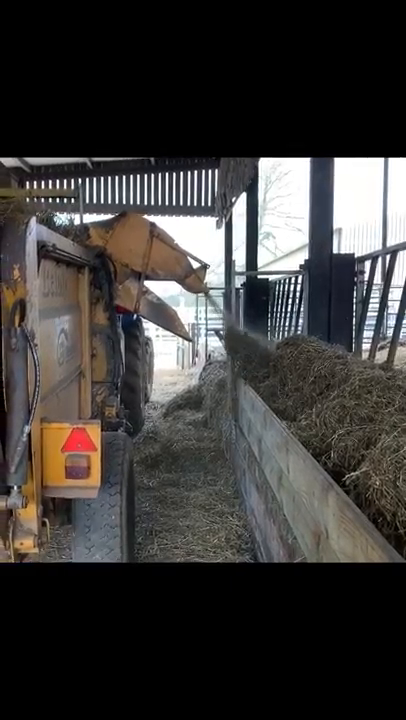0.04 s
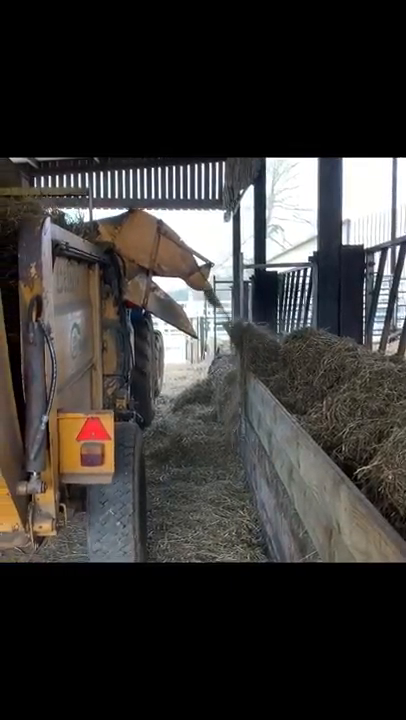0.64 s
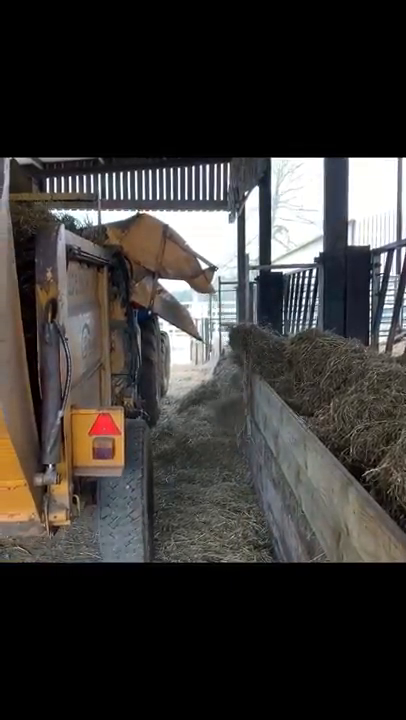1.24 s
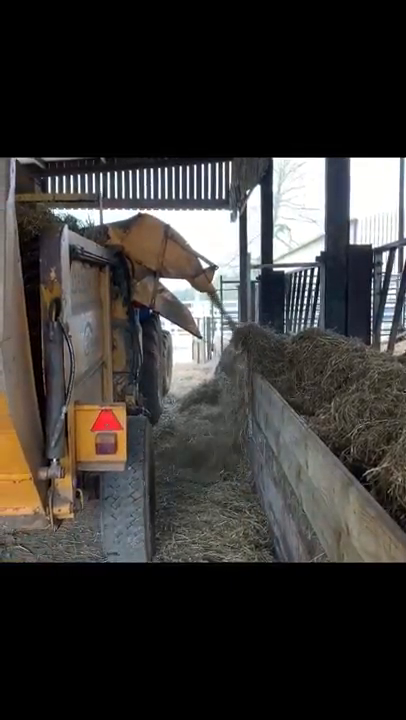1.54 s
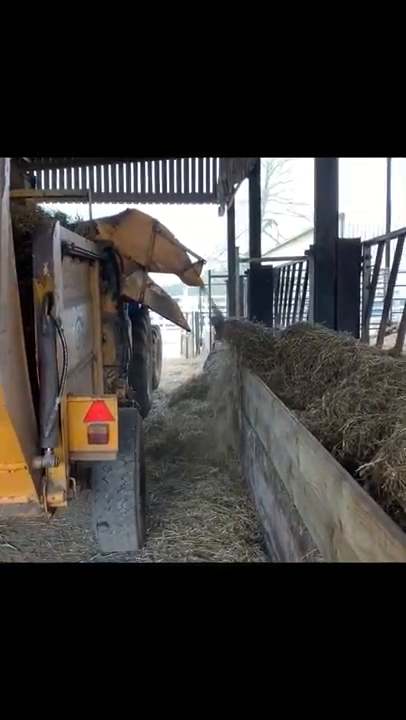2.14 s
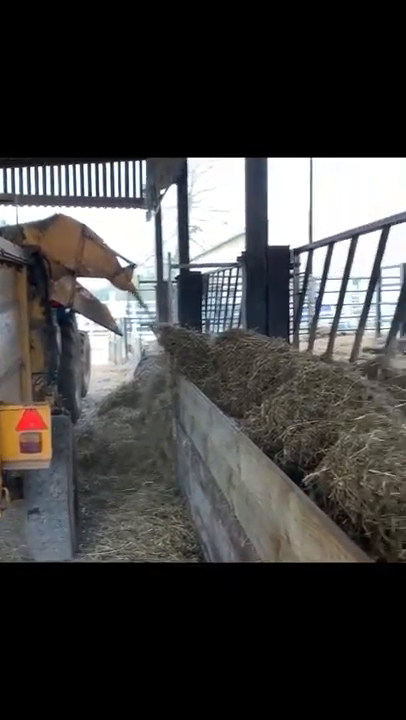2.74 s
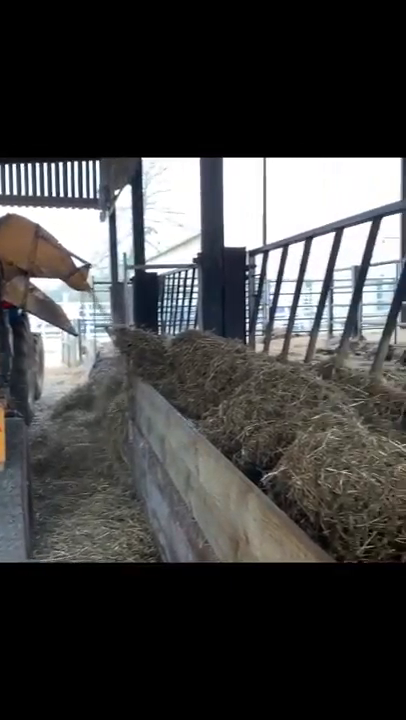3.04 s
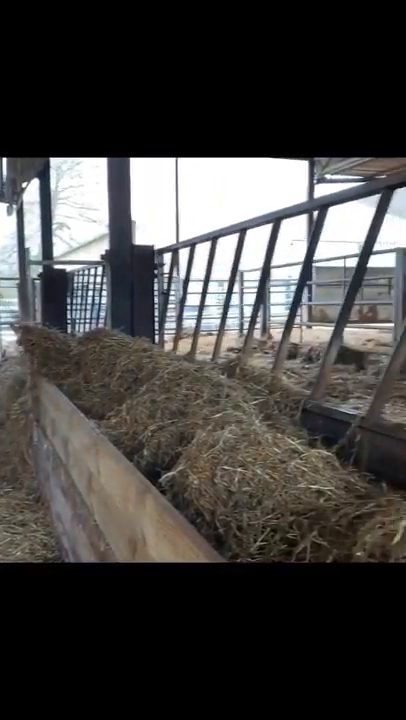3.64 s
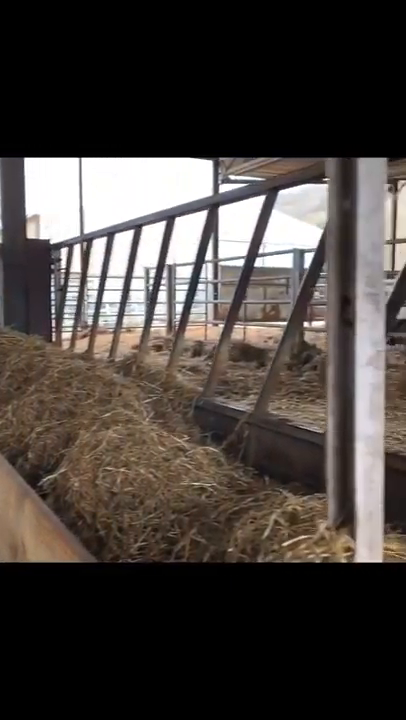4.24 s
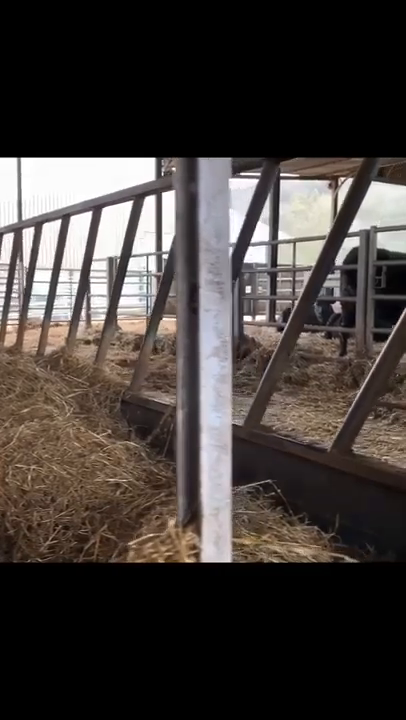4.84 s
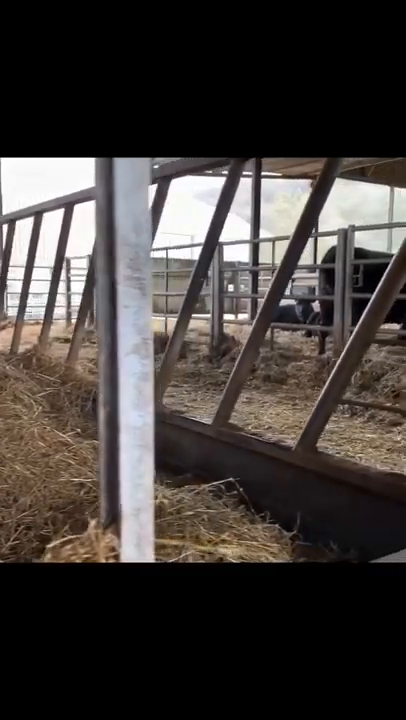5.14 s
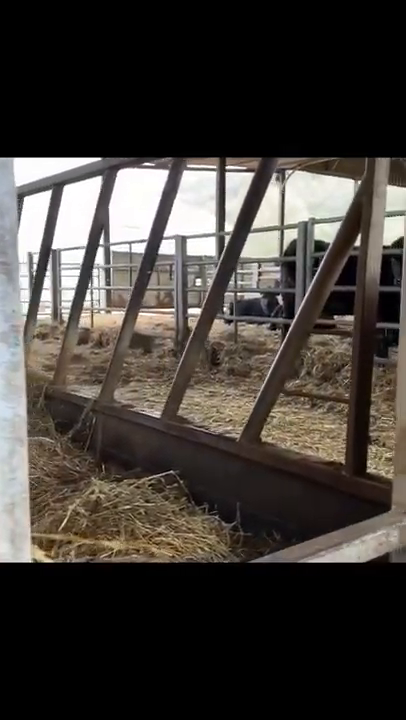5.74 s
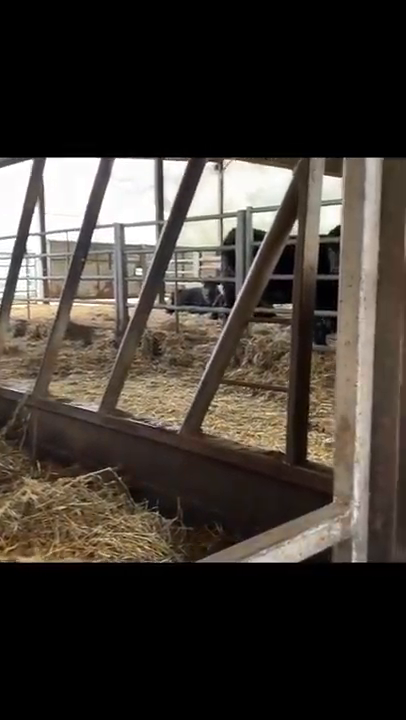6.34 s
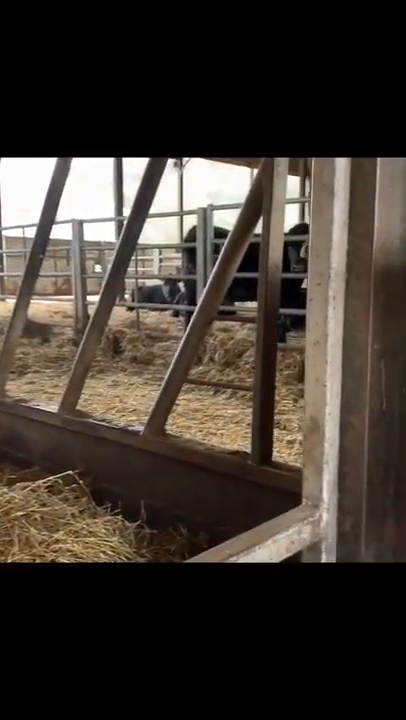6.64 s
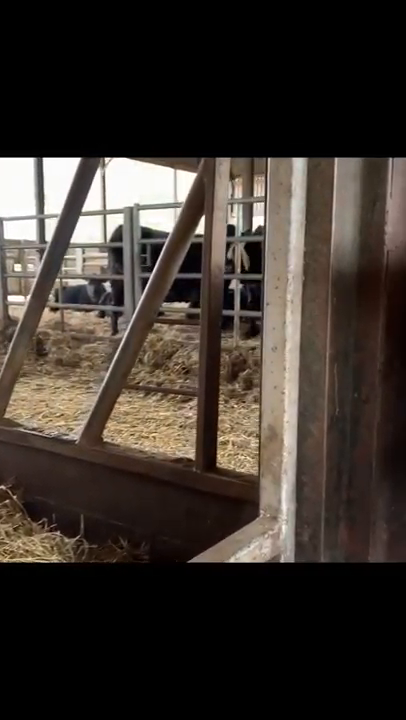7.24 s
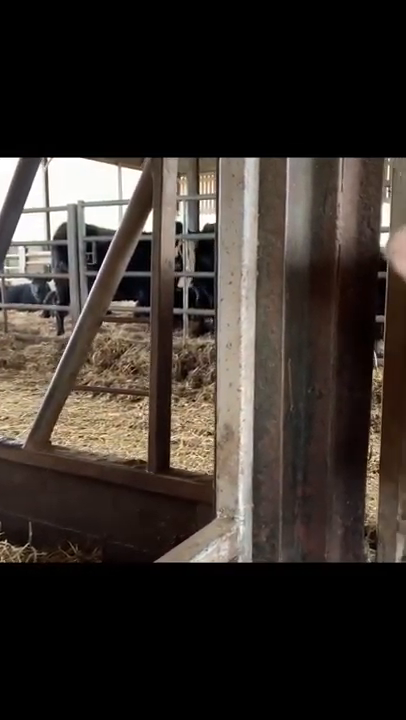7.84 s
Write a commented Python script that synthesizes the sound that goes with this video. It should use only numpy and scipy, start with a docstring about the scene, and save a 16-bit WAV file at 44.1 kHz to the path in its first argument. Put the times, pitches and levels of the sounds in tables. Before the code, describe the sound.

A diesel tractor drives a bale shredder in an open barn, running throughout with a deep, throbbing hum, light knocking and a blower's roar. Hay hisses out of the metal spout with faint rattles, scrapes and ticks. The engine dips slightly near the start, then recovers. As the microphone turns away, the machine shifts to the left and gets a little quieter.

```python
"""Bale shredder in a cattle barn.

A tractor drives a shredder that blows hay along the feed passage of an open barn. The four-cylinder
diesel knocks, sags under the load and recovers; the flywheel blower drones and roars as its paddles
chop the air; hay rings the sheet-metal spout and hisses out of it. The microphone, a pair of ports,
slowly turns away, so the machine moves to the left and grows a little quieter."""
import sys
import numpy as np
from scipy import signal
from scipy.fft import rfft, irfft, next_fast_len
from scipy.io import wavfile
from scipy.ndimage import map_coordinates

SR = 44100
rng = np.random.default_rng(int(sys.argv[2]) if len(sys.argv) > 2 else 0)


def wav_record(signal):
    """Record a signal, one row per channel, as 16-bit PCM in the file named by sys.argv[1]."""
    frames = np.transpose(np.atleast_2d(signal))
    bounded = np.clip(frames, -1, 1)
    # unit amplitude maps onto the largest positive 16-bit level
    quanta = np.round(bounded * 32767).astype(np.int16)
    wavfile.write(sys.argv[1], SR, quanta)


N = 356328
TIME = np.arange(N) / SR
FFT_SIZE = next_fast_len(N)
BIN_HZ = np.arange(FFT_SIZE // 2 + 1) * SR / FFT_SIZE
LEFT_RIGHT = np.array([[1], [-1]])
PADDLES_PER_TURN, SHAFT_PER_TURN, DRUM_PER_TURN = 1.008, .5235, .128   # cycles per crank turn

# Rotation of the microphone. Each row: time in seconds, share of the turn (0 facing, 1 away).
MICROPHONE_TURN = [(0, 0), (2.3, 0.01), (3.5, 0.23), (5.5, 0.65), (8.08, 0.92)]
# Mismatch of the ports. Each row: frequency in Hz, left over right in dB.
PORT_MISMATCH = [(30, 0.8), (110, 0.5), (3000, -0.5), (4200, 1.5), (5100, -2.5), (6200, -4.5), (7400, 1),
                 (8500, -0.5)]
# Course of a brief reedy buzz. Each row: time in seconds, level in dB, resonance in Hz.
BUZZ_COURSE = [(5.17, -66, 1600), (5.3, -57, 1690), (5.35, -51.5, 1740), (5.42, -50.5, 1780),
               (5.47, -49.5, 1930), (5.58, -52, 2030), (5.65, -55, 2120), (5.69, -68, 2140)]
# Stalks flicking the spout. Each row: start in seconds, level in dB, centre in Hz, T60 in seconds.
STALK_FLICKS = [(.25, -51, 10000, .08), (.491, -45, 8000, 0.17), (.52, -50, 7000, 0.11),
                (1.18, -57, 6000, .1), (1.62, -51, 9000, 0.19), (2.06, -49, 6500, .15),
                (2.14, -50, 10000, 0.19), (3.17, -51, 10000, .14), (3.772, -50, 8000, .13),
                (5.07, -49, 10000, .12), (6.524, -51, 9000, 0.14), (7.1, -51, 6000, .1),
                (7.75, -52, 9000, .15)]
# Hay scraping the spout, and one short row at 4.157 s for a clod thumping it. Each row: middle and length in
# seconds, centre and width in Hz, level in dB.
SPOUT_SCRAPES = [(.2, .8, 1280, 240, -46), (.4, .4, 3680, 1800, -55), (.44, .1, 2200, 900, -45),
                 (.793, .036, 3400, 2800, -41.5), (1.5, 1, 1184, 160, -48), (2.85, .7, 1305, 70, -49),
                 (3.45, .32, 2600, 400, -51), (3.7, .25, 3300, 1100, -52), (4.25, .6, 2350, 400, -47),
                 (4.15, .75, 2660, 220, -55), (4.157, .018, 660, 280, -31), (5.13, .18, 2290, 200, -50),
                 (5.6, .12, 2600, 260, -53), (6.25, .26, 2720, 300, -50.5)]
# Sheet-metal modes of the spout. Each row: frequency in Hz, level in dB facing and turned away.
SPOUT_MODES = [(1165, -56, -61), (1307, -57, -65), (1475, -60, -66), (2060, -60, -59), (2314, -59.5, -56),
               (2615, -59, -57.5), (3490, -61, -67), (4470, -69, -69)]
# Spectra of the broadband sources. Each row: frequency in Hz, relative spectral density in dB.
HAY_SPECTRUM = [(1500, 13.5), (3500, 8), (5500, -3), (7000, 4), (8600, 0.5), (11000, 1.5), (12700, -1),
                (14800, -4), (16000, -12)]
CLATTER_SPECTRUM = [(300, -3.5), (1000, -0.5), (1500, 2.5), (2050, 3.5), (2600, 1.5), (3050, -6),
                    (3500, -4.5), (4100, -6), (4800, -8), (5800, -14.5), (9000, -30)]
KNOCK_SPECTRUM = [(350, -10), (550, 5), (720, 4.5), (950, -3.5), (1300, -6), (2400, -8), (3200, -13.5),
                  (4500, -17), (6000, -32)]
ROAR_SPECTRUM = [(20, -42), (32, -21), (50, -2), (85, -1.5), (140, 1.5), (240, 1.5), (320, 0.5), (420, -3),
                 (520, -10), (700, -20.5), (1000, -25.5), (2000, -33)]
RUSH_SPECTRUM = [(250, -20), (420, -2.5), (560, 1.2), (720, -1.5), (900, -6.5), (1200, -9), (1600, -15),
                 (3000, -25.5), (6000, -73)]
# Speed of the crankshaft. Each row: time in seconds, turns per second.
CRANK_SPEED = [(0, 30.27), (.25, 30.28), (.5, 29.66), (.85, 29.7), (1.4, 30.19), (2.1, 30.27), (3, 31.01),
               (4, 31.43), (8.08, 31.52)]
# Strength of the four firings. Each entry: relative level of one cylinder in dB.
CYLINDER_DB = [1.3, -1.5, 0.42, -0.6]
# Line spectra of the engine, the blower paddles and the drive shaft.
# Each row: multiple of that part's rate, level in dB facing and turned away.
ENGINE_ORDERS = [(1, -58, -55), (3.5, -56, -51), (4.5, -49, -56), (5.5, -53, -44), (7, -43.5, -50),
                 (7.5, -54, -48), (8, -39, -43.5), (8.5, -46, -52), (9, -49, -46.5), (9.5, -45.5, -52),
                 (10, -52, -47), (10.5, -44, -47), (12.5, -58, -53), (14, -49, -49), (15, -60, -49),
                 (16, -56, -48), (17, -54, -57), (18, -57, -50.5), (20, -54, -59), (22, -58, -56),
                 (24, -56, -61), (28, -57.5, -58), (34, -59, -59.5)]
PADDLE_ORDERS = [(5, -40, -33.5), (7, -44, -45.5), (8, -47.5, -50.5), (9, -51, -43), (10, -48, -45.5),
                 (11, -52, -50), (13, -45, -45.3)]
SHAFT_ORDERS = [(2, -52, -56), (3, -56, -58), (4, -38.5, -54), (5, -53, -52), (7, -41, -47),
                (8, -44, -46.5), (12, -74, -53)]
# Envelope of the hum. Each row: time in seconds, levels of the 2nd, 4th and 6th orders in dB.
HUM_ENVELOPE = [(0, -35, -38, -33), (.5, -39, -34, -33.5), (1.3, -42, -35.5, -29.5), (2.3, -39, -35, -29.5),
                (3.2, -39, -32.5, -28), (4.1, -37.5, -34.5, -30.5), (4.9, -41, -37, -32),
                (6.3, -37, -39, -32), (8.08, -40.5, -39.5, -35)]
# Orders that engine and blower share. Each row: multiple of the rotation rate, then in dB relative
# to the envelope the engine facing, the engine turned away and the blower.
HUM_ORDERS = [(2, -2.5, -2, -3), (4, 2.5, -.5, -1.5), (6, -0.5, 0, -38)]


def from_db(db):
    """Amplitude ratio of a level in decibels."""
    return 10 ** (np.asarray(db) / 20)


def unit_rms(x):
    """Normalisation to rms 1."""
    return x / np.sqrt(np.mean(x ** 2) + 1e-20)


def curves(rows):
    """Linear interpolation in time: one curve for each column after the first."""
    seconds, *columns = np.transpose(rows)
    return [np.interp(TIME, seconds, column) for column in columns]


def turning(facing, away):
    """Interpolation between two values as the microphone turns."""
    return facing + (away - facing) * curves(MICROPHONE_TURN)[0]


def filtered(x, gain):
    """Linear filtering: one gain for each frequency bin."""
    return irfft(rfft(x, FFT_SIZE) * gain, FFT_SIZE)[..., :N]


def coloured(x, spectrum):
    """Spectral shaping along a logarithmic frequency axis; rms 1."""
    hz, db = np.transpose(spectrum)
    gain_db = np.interp(np.log(BIN_HZ + 1), np.log(hz), db, left=-90, right=-90)
    return unit_rms(filtered(x, from_db(gain_db)))


def drift(rate_hz):
    """Random fluctuation of spread 1: noise low-passed at rate_hz."""
    hop, settling = 100, 1000
    pole = np.exp(-2 * np.pi * rate_hz * hop / SR)
    noise = rng.standard_normal(N // hop + settling + 2)
    slow = signal.lfilter([1], [1, -2 * pole, pole * pole], noise)[settling:]
    return np.interp(np.arange(N) / hop, np.arange(len(slow)), unit_rms(slow))


def tone(cycles):
    """A sinusoid of rms 1 and random phase that follows a count of cycles."""
    return np.sqrt(2) * np.sin(2 * np.pi * (cycles + rng.random()))


def ringing(t60_s):
    """Impulse response of a body with very many modes: exponentially decaying noise."""
    t = TIME[:SR // 4]
    response = rng.standard_normal(len(t)) * from_db(-60 * t / t60_s)
    return response / np.sqrt(np.sum(response ** 2))


def at_ports(source):
    """Path difference: sound from the machine reaches the left port first."""
    lead_ms = turning(.18, .47)
    shifts = LEFT_RIGHT * lead_ms * SR / 2000   # half to each port, in samples
    return np.array([map_coordinates(source, [np.arange(N) + shift], order=1) for shift in shifts])


def in_barn(x, spectrum, wet_db, port_gap_s=.0004):
    """Diffuse field: roof and walls add a wash with the spectrum of the direct sound; rms 1."""
    direct = at_ports(coloured(x, spectrum))
    coherence = np.sinc(2 * BIN_HZ * port_gap_s)   # long waves are alike at both ports
    wash = coloured(rng.standard_normal((2, N)), spectrum)
    mid, side = filtered(wash, np.sqrt([(1 + coherence) / 2, (1 - coherence) / 2]))
    return unit_rms(direct + from_db(wet_db) * np.array([mid + side, mid - side]))


def with_reflections(x, lowest_hz=550, count=8, echo_db=-17.5, slide_s_per_s=.0016):
    """Comb filtering: echoes from steel posts and the feed wall slide as the microphone moves."""
    upper = signal.sosfilt(signal.butter(2, lowest_hz, "high", fs=SR, output="sos"), x)
    out = x.copy()
    for delay_s, slide in zip(rng.uniform(.008, .028, count), rng.uniform(-1, 1, count)):
        emitted_s = TIME - delay_s - slide_s_per_s * slide * (TIME - TIME.mean())
        out += from_db(echo_db) * np.array([np.interp(emitted_s, TIME, port) for port in upper])
    return out


def buzz(pitch_hz=186.7, half_width_hz=260, jitter=.0015, flutter_db=1.8, even_db=-4.5, lean_db=5):
    """A rising resonance picks out the harmonics of a reedy tone, the odd ones strongest."""
    level_db, centre_hz = curves(BUZZ_COURSE)
    cycles = np.cumsum(pitch_hz * (1 + jitter * drift(34))) / SR
    reedy = np.zeros(N)
    for k in range(8, 14):
        harmonic = tone(k * cycles) * from_db(flutter_db * drift(25) + even_db * (k % 2 == 0))
        reedy += harmonic / (1 + ((k * pitch_hz - centre_hz) / half_width_hz) ** 2)
    sounding = (TIME > BUZZ_COURSE[0][0]) & (TIME < BUZZ_COURSE[-1][0])
    return from_db(level_db + lean_db * LEFT_RIGHT) * sounding * reedy


def stalks(cracks_per_s=2500):
    """Impact noise: each stiff stalk on the spout gives a decaying crackle an octave wide."""
    out = np.zeros(N)
    t = TIME[:SR // 4]
    for start_s, db, hz, t60_s in STALK_FLICKS:
        band = signal.butter(1, [hz / np.sqrt(2), hz * np.sqrt(2)], "band", fs=SR, output="sos")
        cracks = rng.standard_normal(len(t)) * (rng.random(len(t)) < cracks_per_s / SR)
        at = round(start_s * SR)
        out[at:at + len(t)] += unit_rms(signal.sosfilt(band, cracks)) * from_db(db - 60 * t / t60_s)
    return out


def hay_hiss(bits_per_s=9000, size_db=3, clump_db=.77, scatter_db=-11):
    """Shot noise: thousands of bits of straw brush the spout and land, in clumps."""
    sizes = from_db(size_db * np.minimum(rng.exponential(1, N), 4)) * rng.choice([-1, 1], N)
    grains = coloured(sizes * (rng.random(N) < bits_per_s / SR), HAY_SPECTRUM)
    level = from_db(turning(-49.5, -52.5) + clump_db * drift(12))
    left = level * grains + stalks()
    offset_s, offset_rad = .0002127, 1.89   # short waves meet the two ports out of step
    right = filtered(left, np.exp(1j * (2 * np.pi * BIN_HZ * offset_s - offset_rad)))
    scattered = level * coloured(rng.standard_normal((2, N)), HAY_SPECTRUM)
    return np.array([left, right]) + from_db(scatter_db) * scattered


def scrapes(slip_db=3, slips_per_s=45):
    """Stick-slip friction: each scrape of hay excites one resonance of the spout, swells and fades."""
    out = np.zeros((2, N))
    friction = rng.standard_normal((2, N)) * from_db(slip_db * drift(slips_per_s))
    for middle_s, length_s, hz, width_hz, db in SPOUT_SCRAPES:
        band = signal.butter(2, [hz - width_hz / 2, hz + width_hz / 2], "band", fs=SR, output="sos")
        swell = np.exp(-2 * ((TIME - middle_s) / length_s) ** 2)
        out += from_db(db) * swell * unit_rms(signal.sosfilt(band, friction))
    return out


def spout_rattle(hits_per_s=700, t60_cycles=105):
    """Modal ringing: hard bits of stalk pelt the spout, each exciting its modes in a different mix."""
    hits = rng.random(N) < hits_per_s / SR
    out = np.zeros((2, N))
    for hz, facing_db, away_db in SPOUT_MODES:
        radius = from_db(-60 * hz / (t60_cycles * SR))
        feedback = [1, -2 * radius * np.cos(2 * np.pi * hz / SR), radius * radius]
        clicks = hits * rng.standard_normal((2, N)) + 1e-18
        ring = signal.lfilter([1, 0, -1], feedback, clicks)
        out += from_db(turning(facing_db, away_db)) * unit_rms(ring)
    return out


def valve_clatter(turns, depth=.3):
    """Amplitude-modulated noise: injectors and valves rattle in step with the firings."""
    rattle = rng.standard_normal(N) * (1 + depth * np.cos(4 * np.pi * turns))
    return from_db(turning(-44, -44.5)) * in_barn(rattle, CLATTER_SPECTRUM, wet_db=7.5)


def diesel_knock(turns, t60_s=.13, uneven_db=1.2, level_db=-45.5):
    """Periodic impacts: two firings a turn ring the engine block, giving a fine comb of lines."""
    firings = np.flatnonzero(np.diff(np.floor(2 * turns)))
    strength_db = uneven_db * rng.standard_normal(N)
    shared = np.array([ringing(t60_s), ringing(t60_s)])   # one path to each port
    block = np.zeros((2, N))
    for cylinder, db in enumerate(CYLINDER_DB):
        at = firings[cylinder::len(CYLINDER_DB)]
        knocks = np.zeros((1, N))
        knocks[0, at] = from_db(db + strength_db[at])
        own = np.array([ringing(t60_s), ringing(t60_s)])   # each cylinder shakes the block its own way
        block += signal.fftconvolve(knocks, shared + own, axes=1)[:, :N]
    return from_db(level_db) * coloured(block, KNOCK_SPECTRUM)


def harmonics(turns, orders, waver_db):
    """Line spectrum of a rotating part; each line wavers in level on its own."""
    return sum(from_db(turning(facing_db, away_db) + waver_db * drift(1)) * tone(order * turns)
               for order, facing_db, away_db in orders)


def hum(turns, waver_db=1.4, blower_in_step_s=2.23):
    """Beats: the blower runs slightly ahead of the crank, so the orders they share throb slowly."""
    # the cooling fan's blade tone beats with one engine order about five times a second
    fan_blades_per_turn, fan_beats_with, fan_in_step_s, fan_db = 6.165, 6, 2.166, -8.5
    crank_turns = turns - np.interp(blower_in_step_s, TIME, turns)
    fan_lead = (fan_blades_per_turn - fan_beats_with) * (turns - np.interp(fan_in_step_s, TIME, turns))
    out = np.zeros(N)
    for (order, facing_db, away_db, blower_db), level_db in zip(HUM_ORDERS, curves(HUM_ENVELOPE)):
        engine_cycles = order * crank_turns + rng.random()
        blower_cycles = engine_cycles + order * (PADDLES_PER_TURN - 1) * crank_turns
        partials = [(engine_cycles, turning(facing_db, away_db)), (blower_cycles, blower_db)]
        if order == fan_beats_with:
            partials.append((engine_cycles + fan_lead, fan_db))
        for cycles, db in partials:
            level = from_db(level_db + db + waver_db * drift(1))
            out += level * np.sqrt(2) * np.sin(2 * np.pi * cycles)
    return out


def drone(turns, flutter_db=.57):
    """Superposition: exhaust, paddle and shaft tones beat together; uneven firing roughens the hum."""
    engine = harmonics(turns, ENGINE_ORDERS, waver_db=1.5)
    paddles = harmonics(turns * PADDLES_PER_TURN, PADDLE_ORDERS, waver_db=2.2)
    shaft = harmonics(turns * SHAFT_PER_TURN, SHAFT_ORDERS, waver_db=.5)
    uneven = from_db(flutter_db * drift(11))
    return at_ports(uneven * hum(turns) + engine + paddles + shaft)


def hay_flow(turns, ragged=1.2):
    """Quasi-periodic feed: the drum tears off one bunch each revolution, no two alike; spread 1."""
    return unit_rms(tone(DRUM_PER_TURN * turns) + ragged * drift(8))


def blower(turns, flow, chop=.13, gust_db=1, surge_db=.65):
    """Flow noise chopped by the paddles: a deep roar from the housing, a brighter rush from the spout."""
    puffs = (1 + chop * np.cos(2 * np.pi * PADDLES_PER_TURN * turns)) * from_db(gust_db * drift(5.6))
    roar = in_barn(rng.standard_normal(N) * puffs, ROAR_SPECTRUM, wet_db=-3.5)
    rush = in_barn(rng.standard_normal(N) * puffs, RUSH_SPECTRUM, wet_db=-1.5)
    return from_db(turning(-29, -31)) * roar + from_db(turning(-34.5, -38) + surge_db * flow) * rush


def scene(rattle_surge_db=.75, hiss_surge_db=.66):
    """Common modulation: one crankshaft paces the machine; each bunch of hay swells hiss and rattle."""
    turns = np.cumsum(curves(CRANK_SPEED)[0]) / SR
    flow = hay_flow(turns)
    pan = from_db(turning(2, 4) * LEFT_RIGHT / 2)   # the deep sounds favour the left port
    rattling = from_db(rattle_surge_db * flow) * (valve_clatter(turns) + spout_rattle() + scrapes())
    machine_noise = pan * (blower(turns, flow) + diesel_knock(turns)) + rattling
    machine = pan * drone(turns) + with_reflections(machine_noise)
    return machine + from_db(hiss_surge_db * flow) * hay_hiss() + buzz()


def record(dry, cutoff_hz=15300):
    """Frequency response: each port colours the sound its own way, and the top is cut steeply."""
    mismatch_db = np.interp(BIN_HZ, *np.transpose(PORT_MISMATCH))
    heard = filtered(dry, from_db(mismatch_db * LEFT_RIGHT / 2))
    return signal.sosfilt(signal.ellip(10, .1, 90, cutoff_hz, fs=SR, output="sos"), heard)


dry = scene()
out = record(dry)
wav_record(out)
```